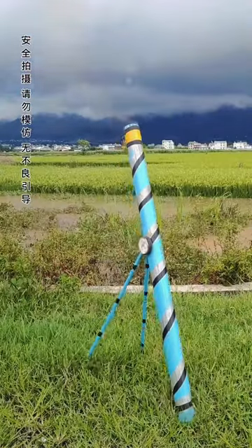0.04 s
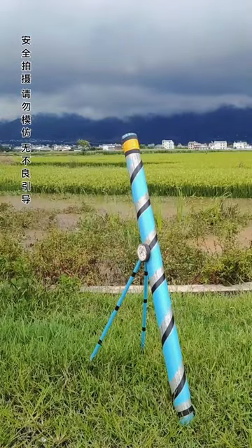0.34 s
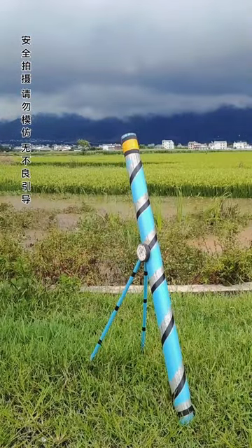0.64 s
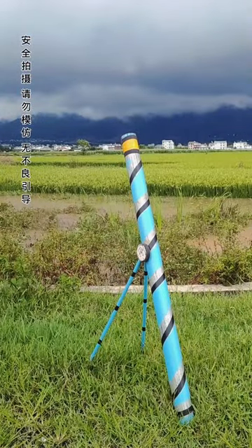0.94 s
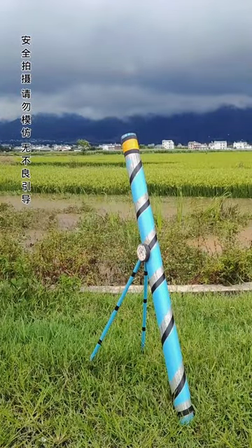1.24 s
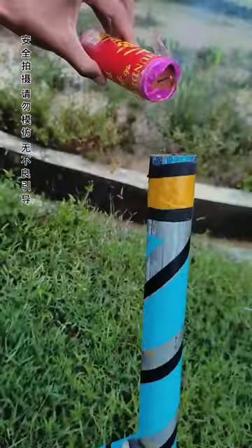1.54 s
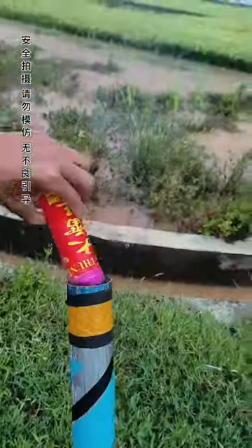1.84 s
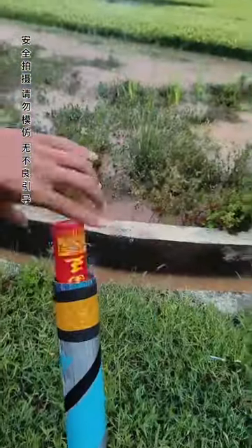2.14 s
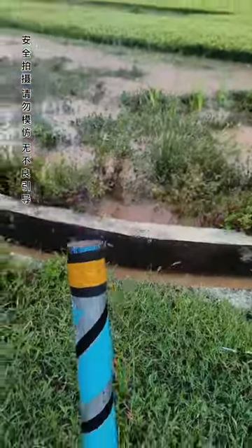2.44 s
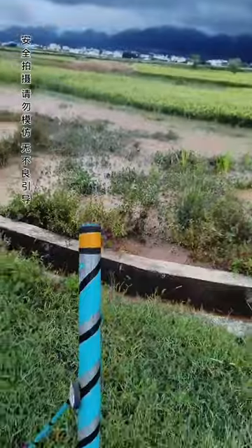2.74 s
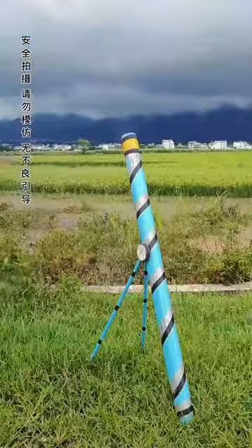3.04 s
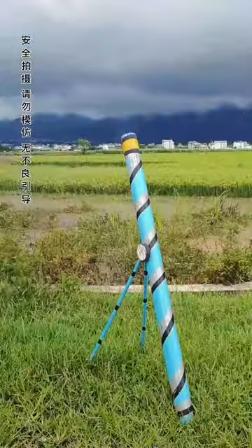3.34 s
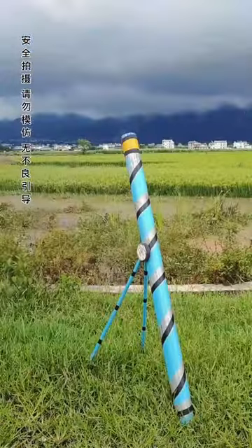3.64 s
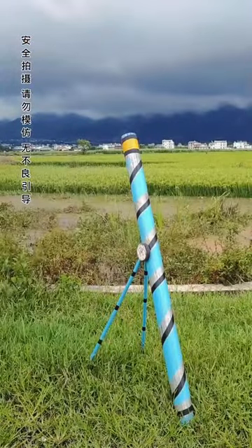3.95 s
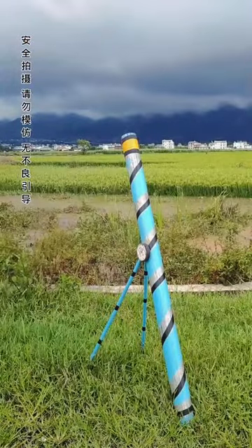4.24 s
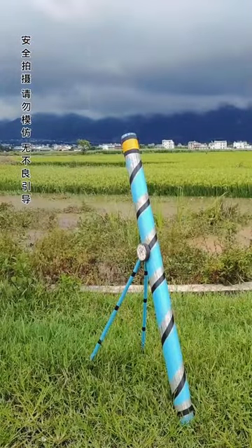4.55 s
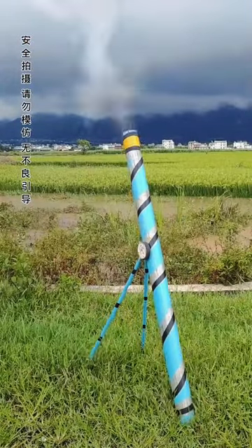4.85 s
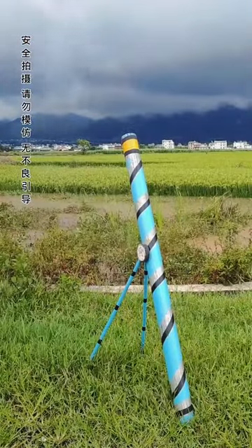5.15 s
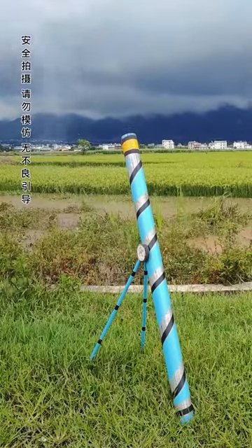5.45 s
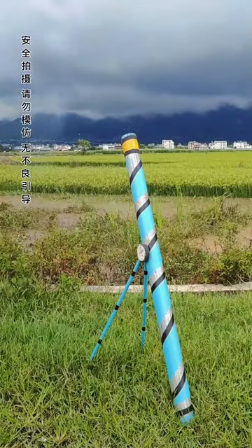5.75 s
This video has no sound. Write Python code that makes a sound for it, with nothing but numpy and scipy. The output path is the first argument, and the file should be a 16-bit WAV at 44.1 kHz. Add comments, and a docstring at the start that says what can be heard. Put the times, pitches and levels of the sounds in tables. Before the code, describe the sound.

A firecracker goes off in a steel tube with a sharp crack, a metallic ring and an echo over an open field. A fuse then hisses and sputters close to the microphone. A short knock follows, and feet brush through dry grass to the right with small ticks. A second sharp blast rings the tube near the end. Gusty wind rumbles and thumps on the microphone for most of the time.

```python
"""A sharp crack, a ringing steel tube and an echo over the paddies: two firecrackers in an open field.
The microphone's gain control flattens each blast, so the ring of the tube's wall swells out of it.
Between the blasts a fuse hisses and flares close by, and feet brush through grass off to the right.
Gusty wind buffets the two microphone ports throughout, over the soft rush of the breeze."""
import sys
import numpy as np
from scipy import signal
from scipy.fft import rfft, irfft, next_fast_len
from scipy.io import wavfile
from scipy.ndimage import uniform_filter1d, map_coordinates

SR = 44100
rng = np.random.default_rng(int(sys.argv[2]) if len(sys.argv) > 2 else 0)


def put_to_file(sound):
    """Save the sound as 16-bit audio at rate SR, in the file named by the first command-line argument."""
    columns = np.atleast_2d(sound).T  # one column per channel
    safe = np.clip(columns, -1, 1)
    whole_steps = np.round(safe * 32767)
    wavfile.write(sys.argv[1], SR, whole_steps.astype(np.int16))


N = 255339
TIME = np.arange(N) / SR

# wall modes of the tube: (frequency [Hz], t60 [s], level in first blast [dB], level in second [dB])
TUBE_MODES = [(939, .9, -28, -30), (1206.5, 1.7, -22.5, -33), (1310, .9, -33, -26), (1845, 1.35, -17, -24),
              (2029, .46, -3.5, -9), (2128, .45, -14, -16), (2680, .4, -22, -15), (2779, .44, -9, -15),
              (2949, .42, -8, -19), (3033.4, .38, -19, 2.5), (3313, .5, -20, -24), (3361.2, .94, -4.5, -10),
              (3389, .94, -4, -14.5), (3409, .45, -26, -17), (3493, .5, -17, -14), (3539, .6, -12, -16),
              (3776, .4, -13, -8), (3827, .4, -20, -14), (3920, .3, -24, -20), (4017, .3, -22, -13),
              (4204, .35, -21, -12), (4465, .3, -22, -20), (4861, .3, -20, -19), (5006, .3, -25, -17),
              (5200, .3, -26, -20), (5383, .3, -26, -20), (5780, .3, -26, -20), (6238, .26, -20, -11),
              (6278, .3, -17, -16), (6430, .3, -26, -14), (6584, .3, -21, -16), (6811, .27, -17, -10),
              (7160, .22, -26, -14), (7455, .22, -21, -13), (7560, .2, -24, -15)]
# high fizz of the fuse and of bright ticks underfoot: (frequency [Hz], level [dB])
FIZZ_SPECTRUM = [(8500, -57), (10300, -14.5), (11800, -14), (13700, -4.5), (15500, -12.5), (17000, -5.5)]


def amp(db):
    """Decibels to gain."""
    return 10 ** (np.asarray(db) / 20)


def unit(x):
    """Scale to rms 1."""
    return x / np.sqrt(np.mean(x ** 2) + 1e-20)


def pan(db):
    """Gains of the two ports for a level of left minus right."""
    return amp(np.vstack([db, -db]) / 2)


def along(points, hz):
    """(Hz, value) points read on a log axis."""
    knots_hz, values = np.transpose(points)
    return np.interp(np.log(hz + 1), np.log(knots_hz), values)


def curves(rows):
    """One value per sample for each column after the time."""
    times, *columns = np.transpose(rows)
    return [np.interp(TIME, times, column) for column in columns]


def wobble(rate):
    """A smooth random curve, rate knots a second."""
    return map_coordinates(rng.standard_normal(8192), [TIME * rate], mode="wrap")


def swell(start, length, attack_s, release_s):
    """An envelope that rises, holds until length has passed, then dies away."""
    t = TIME - start
    return np.clip(t / attack_s, 0, 1) * np.exp(-np.clip((t - length) / release_s, 0, 20))


def specks(per_s, size_db, life_s):
    """A level of rms 1 with tiny bursts at random moments."""
    hits = (rng.random(N) < per_s / SR) * rng.random(N)
    return unit(1 + amp(size_db) * signal.lfilter([1], [1, -np.exp(-1 / (life_s * SR))], hits))


def add(track, start, sound):
    """Mix a stereo sound in at start seconds."""
    part = track[:, round(start * SR):][:, :sound.shape[1]]
    part += sound[:, :part.shape[1]]


def filtered(x, response):
    """Filter x by a response given as a function of frequency."""
    size = next_fast_len(x.shape[-1] + 8192)
    return irfft(rfft(x, size) * response(np.fft.rfftfreq(size, 1 / SR)), size)[..., :x.shape[-1]]


def noise(spectrum, alike=0, lag_ms=0, apart_hz=20000, size=N):
    """Stereo noise of rms 1; a shared part fades above apart_hz and reaches the right lag_ms later."""
    white = rng.standard_normal((3, size))
    share = lambda hz: alike / (1 + (hz / apart_hz) ** 2)
    colour = lambda hz: amp(along(spectrum, hz))
    delay = lambda hz: np.exp(np.outer([1, -1], 1j * np.pi * hz * lag_ms / 1000))
    shared = filtered(white[2], lambda hz: colour(hz) * np.sqrt(share(hz)) * delay(hz))
    separate = filtered(white[:2], lambda hz: colour(hz) * np.sqrt(1 - share(hz)))
    return unit(shared + separate)


def patchy(x, depth_db):
    """Random gain in patches of about 600 Hz by 80 ms."""
    bins = signal.stft(x, nperseg=512)[2]
    patches = uniform_filter1d(rng.standard_normal(bins.shape[1:]), size=7, axis=0)
    patches = uniform_filter1d(patches, size=14, axis=1)
    return unit(signal.istft(bins * amp(depth_db * unit(patches)), nperseg=512)[1][:, :N])


def ragged(x, depth_db):
    """Crowded resonances cut random ridges and valleys into a spectrum."""
    ridges = lambda hz: map_coordinates(rng.standard_normal(2048), [hz / 24], mode="wrap")
    return unit(filtered(x, lambda hz: amp(2 * depth_db * np.tanh(ridges(hz) - .5))))


def dying(x, decay):
    """Each frequency of x fades with its own t60."""
    hz, t, bins = signal.stft(x, SR, nperseg=256)
    fade = amp(-60 * t / along(decay, hz)[:, None])
    return signal.istft(bins * fade, SR, nperseg=256)[1][:, :x.shape[1]]


def breeze():
    """The soft rush of air over the paddies, all round the microphone."""
    # moving air: (frequency [Hz], level [dB])
    air_spectrum = [(30, 15.5), (200, 8.5), (500, 7), (1000, 4.5), (1600, -3), (3000, -4), (4200, -12.5),
                    (7000, -15.5), (9500, -30.5), (12000, -22), (15500, -23.5)]
    return amp(-45.5 + 0.23 * wobble(1.5)) * noise(air_spectrum, alike=0.48)


def wind():
    """Each port has its own turbulence: slow rumble, lumpy flutter, a rasp at its edge in hard gusts."""
    # steady wind at the microphone: (time [s], level [dB])
    strength = [(0.0, -30), (0.4, -27.5), (0.64, -40.5), (0.77, -25.5), (1.04, -24.5), (1.34, -14),
                (1.4, -29.5), (1.45, -11.5), (1.8, -18), (1.99, -22), (2.15, -18.5), (2.39, -22.5),
                (2.44, -18), (2.55, -23), (2.68, -16.5), (2.8, -15.5), (3.02, -15.5), (3.18, -21.5),
                (3.39, -16.5), (3.85, -13.5), (3.96, -19.5), (4.13, -15), (4.24, -20), (4.4, -15.5),
                (4.78, -14.5), (4.87, -19), (5.06, -25), (5.13, -15), (5.4, -16), (5.55, -21),
                (5.79, -15.5)]
    # which port it leans on: (time [s], lean to the left [dB])
    side = [(0.3, 13), (0.6, -6), (0.85, 14), (1.15, 5.5), (1.4, -3.5), (1.62, -5), (1.9, -5.5), (2.15, 1),
            (2.38, 10.5), (2.65, 2.5), (3.6, 2.5), (3.95, -4), (4.4, -1), (5.1, -0.5), (5.4, 7), (5.7, 1.5)]
    # gusts on top of it: (time [s], length [s], flutter [dB], rumble [dB], left minus right [dB])
    gusts = [(0.787, 0.019, -47, -15.5, 0), (0.963, 0.037, -23.5, -23.5, 24),
             (1.088, 0.044, -35.5, -16.5, 23), (1.17, 0.064, -52, -26, 10), (1.27, 0.064, -25.5, -25, -1),
             (1.443, 0.073, -20.5, -20, -18), (1.527, 0.16, -20, -22, -1.5),
             (1.773, 0.056, -17.5, -11.5, 26), (1.852, 0.042, -25, -15.5, 2),
             (1.908, 0.073, -26, -18.5, -20), (2.017, 0.07, -24.5, -20, 27), (2.103, 0.058, -30, -14.5, -6),
             (2.196, 0.028, -25.5, -19, -23), (2.509, 0.076, -19.5, -11.5, 5),
             (2.601, 0.039, -25.5, -12.5, -6), (2.777, 0.026, -17, -10, 3.5),
             (2.844, 0.096, -16.5, -15.5, 28), (2.984, 0.098, -21, -22, 18), (3.116, 0.019, -15.5, -28, -3),
             (3.234, 0.028, -18, -23, -7.5), (3.367, 0.14, -25, -17.5, -5), (3.504, 0.12, -18, -35, -15),
             (3.669, 0.23, -28, -20, -1), (3.986, 0.021, -20, -15.5, -16), (4.028, 0.058, -21, -15.5, 4),
             (4.125, 0.094, -23.5, -14, -2.5), (4.276, 0.078, -19.5, -20.5, 2),
             (4.38, 0.044, -24.5, -15.5, -3), (4.437, 0.078, -25, -18.5, 12),
             (4.676, 0.12, -21, -18.5, 1.5), (4.951, 0.024, -25, -19, 6), (5.084, 0.093, -26, -17, 1),
             (5.216, 0.046, -21.5, -20, -8), (5.268, 0.14, -28.5, -18, 4), (5.369, 0.07, -22.5, -15.5, -17),
             (5.436, 0.048, -27.5, -29, 2.5)]
    # the three parts of the turbulence: (frequency [Hz], level [dB])
    rumble_spectrum = [(8, -15.5), (25, 0.5), (50, -1.5), (100, -4), (170, -9), (260, -16.5), (400, -38.5),
                       (800, -82), (2000, -120)]
    flutter_spectrum = [(60, -6.5), (160, -2.5), (270, -0.5), (400, -4.5), (550, -15.5), (800, -28.5),
                        (1200, -49), (2000, -68), (4000, -102.5)]
    rasp_spectrum = [(200, -14.5), (600, 6), (1200, -3), (2000, -31), (4000, -64)]
    brisk_db, flutter_growth, rasp_growth = -12, 1.84, 2.13  # flutter outgrows rumble, rasp outgrows both
    attack_s, release_s = 0.024, 0.0075
    strength_db, = curves(strength)
    side_db, = curves(side)
    lean = pan(side_db) ** 2
    lean = lean / lean.mean(axis=0)
    rumble_power = lean * amp(strength_db - 1) ** 2
    flutter_power = lean * amp(brisk_db + flutter_growth * (strength_db - brisk_db) - 10.5) ** 2
    for start, length, flutter_db, rumble_db, pan_db in gusts:
        gust = (unit(pan(pan_db)) * swell(start - attack_s / 2, length, attack_s, release_s)) ** 2
        rumble_power += gust * amp(rumble_db + 2) ** 2
        flutter_power += gust * amp(flutter_db + 2.5) ** 2
    lumps = np.minimum([wobble(90) + .5 * wobble(28) for port in range(2)], 2)
    rumble = np.sqrt(rumble_power) * unit(noise(rumble_spectrum) * amp(2.8 * lumps))
    flutter = np.sqrt(flutter_power) * unit(noise(flutter_spectrum) * amp(4.17 * lumps))
    rasp_level = amp(brisk_db - 16.5) * (np.sqrt(flutter_power) / amp(brisk_db)) ** rasp_growth
    rasp = rasp_level * unit(noise(rasp_spectrum) * amp(8.1 * np.minimum(lumps, 1)))
    return rumble + flutter + rasp


def buffets(spacing_s=0.004604, step_db=-4.5, count=3):
    """An eddy breaks on a port as one rounded pressure spike with weaker, wider ones behind it."""
    # the hardest eddies: (time [s], level [dB], left minus right [dB], first spike's width [ms])
    eddies = [(0.968, -13.5, 21, 0.54), (1.106, -9, 16, 1.2), (1.293, -5.5, 1.5, 1.12),
              (1.449, -7.5, -25, 0.35), (1.544, -4, -15, 0.64), (1.579, -17, -21, 0.62),
              (1.622, -8, 29, 0.56), (1.634, 0.5, 24, 0.42), (1.652, -3, -0.5, 0.35),
              (1.675, -6.5, -18, 0.31), (1.789, 2.5, 28, 0.64), (1.801, -24, 20, 0.55),
              (2.042, -2, 22, 1.3), (2.215, 0.5, -36, 1.04), (2.53, -3, -5, 1), (2.542, -14, -1, 0.89),
              (2.603, -2.5, -31, 0.86), (2.782, -6, 14, 1.8), (2.813, -5, -30, 0.71),
              (2.857, -11, 29, 0.29), (2.873, 1, 25, 1), (2.885, -7, 31, 0.56), (2.898, -1.5, 31, 0.36),
              (2.906, -8, 25, 0.32), (2.912, -1, 24, 0.6), (2.934, -5.5, 3, 0.71), (2.987, -2.5, -22, 0.78),
              (3.013, 2, 31, 0.73), (3.037, -10, 26, 0.48), (3.129, 0.5, -2, 0.78), (3.25, -1.5, -32, 0.47),
              (3.307, -9.5, 25, 0.5), (3.415, 1, 32, 0.36), (3.521, -6, -7, 0.59), (3.541, -0.5, -8, 0.54),
              (3.591, 3, -34, 0.45), (3.602, -13, -30, 0.71), (3.618, -7, -30, 0.51),
              (4.139, -1.5, -20, 0.79), (4.156, -2.5, -11, 0.6), (4.169, -6, -27, 0.54),
              (4.181, -17, -16, 0.98), (4.284, -1, -33, 0.26), (4.299, 1, -20, 0.57),
              (4.316, -0.5, -12, 0.62), (4.346, -10, 17, 0.44), (4.388, -12, 23, 0.38),
              (4.479, -3, 20, 0.9), (4.68, -1, 33, 0.72), (4.705, 1.5, 26, 0.71), (4.716, -2, -8, 0.69),
              (4.734, -9, -14, 0.66), (4.758, -3, -6, 0.58), (4.777, -3, -3, 0.64), (4.828, -7, 3, 0.73),
              (5.24, -0.5, -31, 0.85), (5.403, -7.5, -30, 0.49)]
    out, t, order = np.zeros((2, N)), TIME[:SR // 12], np.arange(count)[:, None]
    lead_s = .01  # room for the first spike to rise
    for start, db, pan_db, width_ms in eddies:
        jitter, polarity = rng.uniform(-1.07, 1, (2, 2, count, 1))
        delay_s = spacing_s * order * (1 + jitter / 2)
        width_s = width_ms / 1000 * (1 + order / 4)
        u = (t - lead_s - delay_s) / width_s
        spikes = np.sign(polarity) * (1 - u ** 2 / 2) / (1 + u ** 2 / 2) ** 3 * amp(step_db * order)
        ports = pan(pan_db)
        add(out, start - lead_s, amp(db) * ports / ports.max() * spikes.sum(axis=1))
    return filtered(out, lambda hz: 1 / (1 + (hz / 1700) ** 4))  # the port's mesh blunts the spikes


def rustles(bounce_ms=4.1, bounce_gain=0.47):
    """Dry blades scrape over coarser grit, off to the right, heard directly and again off the ground."""
    # scraps settling, then steps through grass: (time [s], length [s], blades [dB], grit [dB])
    scrapes = [(0.35, 0.04, -48, -64), (0.488, 0.13, -44, -66), (0.629, 0.14, -40, -59),
               (2.705, 0.018, -35, -40), (3.153, 0.059, -45.5, -67), (3.236, 0.096, -46, -53),
               (3.333, 0.059, -49, -65), (3.394, 0.062, -40.5, -59), (3.665, 0.072, -36, -45),
               (3.757, 0.052, -37, -52), (3.794, 0.025, -36, -34.5), (3.812, 0.058, -35, -61),
               (3.874, 0.038, -37.5, -60), (3.917, 0.052, -37, -57), (4.016, 0.1, -57, -49.5),
               (4.24, 0.069, -42, -52)]
    # dry grass and coarse grit underfoot: (frequency [Hz], level [dB])
    grass_spectrum = [(400, 1.5), (1000, -5.5), (1700, -0.5), (2300, 0), (3000, 2.5), (3600, -5),
                      (4400, -10.5), (7000, -14.5), (9300, -31), (11000, -24.5), (15000, -26)]
    grit_spectrum = [(900, -31), (1500, -9), (1900, 6), (2400, 10), (3200, -24), (6000, -40)]
    blade_level, grit_level = sum(amp(dbs)[:, None] * swell(start, length, 0.021, 0.013)
                                  for start, length, *dbs in scrapes)
    grains = unit(amp(1.45 * wobble(700) + 0.52 * wobble(60)))
    crunch = unit(amp(2.5 * wobble(320)))
    crackles = specks(per_s=130, size_db=3, life_s=0.0012)
    blades = noise(grass_spectrum, alike=1.0, lag_ms=-0.29, apart_hz=7900)
    blades = patchy(ragged(blades, 1.7), depth_db=2.5)
    grit = noise(grit_spectrum, alike=0.72, lag_ms=-0.32)
    direct = blade_level * grains * crackles * blades + grit_level * crunch * grit
    return filtered(direct, lambda hz: 1 + bounce_gain * np.exp(-2j * np.pi * hz * bounce_ms / 1000))


def snaps():
    """Falling scraps, and later stalks and grit, give single dry ticks, some dull and some bright."""
    # ticks of falling scraps after the first blast, then snapping stalks and grit: (time [s], dull part [dB],
    # bright part [dB])
    ticks = [(0.63, -15, -65), (0.68, -14, -63), (0.7554, -18.5, -68), (1.129, -22.5, -36),
             (1.2984, -12.5, -68), (3.1288, -23, -41), (3.206, -22, -66), (3.2468, -16, -50),
             (3.262, -18.5, -36), (3.267, -26, -46), (3.3442, -11, -37), (3.381, -18, -32.5),
             (3.672, -19.5, -58), (3.883, -24, -41), (3.982, -19, -40), (4.088, -25, -49),
             (4.272, -27, -50), (4.824, -23, -76), (5.363, -24, -62), (5.449, -39, -65)]
    # a breaking stalk: (frequency [Hz], level [dB])
    stalk_spectrum = [(500, 3.5), (1700, -10), (2500, 6), (3300, 5), (4500, -8.5), (6500, -12),
                      (8000, -14.5), (9500, -33), (15000, -29)]
    dull, bright, t = np.zeros((2, N)), np.zeros((2, N)), TIME[:SR // 20]
    envelope = (amp(-60 * t / 0.012) + amp(-17 - 60 * t / 0.27)) * pan(0.8)
    for start, dull_db, bright_db in ticks:
        add(dull, start, amp(dull_db - 11) * envelope)
        add(bright, start, amp(bright_db + 1.5) * envelope)
    return (dull * noise(stalk_spectrum, alike=0.77, lag_ms=-0.22)
            + bright * noise(FIZZ_SPECTRUM, alike=.3, lag_ms=-0.43))


def knock(start=3.002, db=-25.5, t60_s=0.045):
    """A short dry knock close to the microphone."""
    # body of the knock: (frequency [Hz], level [dB])
    spectrum = [(400, -3), (900, -1), (1500, -1), (2500, -3), (3200, -22), (8000, -32)]
    out, t = np.zeros((2, N)), TIME[:SR // 20]
    add(out, start, amp(db - 60 * t / t60_s) * noise(spectrum, alike=0.24, size=len(t)))
    return out


def hollowed(x, depth_db=-31.5, width_hz=400):
    """A hollow in the hiss wanders as the fuse moves."""
    # centre of the hollow: (time [s], frequency [Hz])
    hollow_path = [(1.45, 3080), (1.58, 3760), (1.62, 5200), (1.76, 5260), (1.85, 6700), (1.95, 4140),
                   (2.1, 4900), (2.3, 5230), (2.42, 4830), (2.6, 4270)]
    hz, t, bins = signal.stft(x, SR, nperseg=512)
    centre_hz = np.interp(t, *np.transpose(hollow_path))
    notch = amp(depth_db * np.exp(-((hz[:, None] - centre_hz) / width_hz) ** 2))
    return signal.istft(bins * notch, SR, nperseg=512)[1][:, :N]


def fuse(lit_s=1.368, fizz_from_s=1.9, sink_db_per_s=2.5):
    """The fuse sputters and flares as it is carried close past the ports and lowered into the tube."""
    # flare-ups: (time [s], length [s], hiss [dB], sizzle [dB], fizz [dB])
    flares = [(1.421, 0.056, -37, -45.5, -80), (1.512, 0.052, -52, -45, -80), (1.61, .06, -52, -71, -41),
              (1.674, 0.12, -38.5, -56, -38), (1.82, 0.12, -62, -67, -48.5),
              (1.91, 0.17, -40.5, -54.5, -50.5), (2.09, 0.28, -39.5, -53, -68),
              (2.348, 0.16, -37, -49.5, -46.5), (2.467, 0.055, -50, -44, -46)]
    # where the fuse is: (time [s], lead at the left port [ms], left minus right [dB])
    path = [(1.42, 0.079, 3), (1.6, 0.23, 1), (1.76, 0.27, -3.5), (1.91, 0.11, 0), (2.3, 0.085, -0.5),
            (2.52, 0.14, -0.5), (2.7, 0.096, -2)]
    # burning powder: (frequency [Hz], level [dB])
    hiss_spectrum = [(900, 7), (1900, 4.5), (2400, 5.5), (3000, 13.5), (3700, 2), (4600, 2.5), (5400, -3),
                     (6300, -5.5), (8500, -26), (10000, -28), (11000, -80)]
    sizzle_spectrum = [(4000, -34), (5800, -17), (6500, -17.5), (7050, 4.5), (7600, 3), (8300, -8.5),
                       (9800, -12), (11000, -52)]
    burn = swell(lit_s, length=1.35, attack_s=0.059, release_s=0.092)  # ends as the microphone draws back
    burn *= amp(-41 - sink_db_per_s * (TIME - lit_s))
    levels = np.array([burn, amp(-20) * burn, amp(-12) * burn * (TIME > fizz_from_s)])
    for start, length, *flare_db in flares:
        levels = np.hypot(levels, amp(flare_db)[:, None] * swell(start, length, 0.029, 0.04))
    hiss_level, sizzle_level, fizz_level = levels
    sparks = lambda: unit(amp(2.2 * wobble(380)))
    hiss = hiss_level * sparks() * patchy(noise(hiss_spectrum, alike=0.82), depth_db=3.0)
    sizzle = sizzle_level * sparks() * noise(sizzle_spectrum, alike=0.2)
    fizz = fizz_level * patchy(noise(FIZZ_SPECTRUM, alike=0.25), depth_db=3.0)
    spits = specks(per_s=140, size_db=2.5, life_s=0.002)  # grains of powder
    left, right = hollowed(hiss + sizzle + fizz) * spits
    sputter = unit(amp(0.19 * wobble(140) + wobble(30.09)))
    lead_ms, pan_db = curves(path)
    left = map_coordinates(left, [np.arange(N) + lead_ms * SR / 1000], order=5)
    return sputter * pan(pan_db) * np.array([left, right])


def smoke():
    """Smoke rushes from the muzzle with a faint whistle until the first charge bursts."""
    # jet of smoke: (frequency [Hz], level [dB])
    spectrum = [(600, -8), (1200, -1), (2800, 0), (3500, -4), (3900, 3), (4400, -10), (7000, -14),
                (9000, -23), (15000, -27)]
    rush = swell(start=-0.01, length=0.105, attack_s=0.029, release_s=0.0075)
    return amp(-43) * rush * noise(spectrum, alike=0.2)


def thinned(x, valley_db, width_hz=55, above_hz=2200):
    """The treble is thinned between the strong ringing tones, so the blast sounds like a clang."""
    near = lambda hz: np.max([1 / (1 + ((hz - mode[0]) / width_hz) ** 4) for mode in TUBE_MODES], axis=0)
    treble = lambda hz: (hz > above_hz) & (hz < TUBE_MODES[-1][0])
    return filtered(x, lambda hz: amp(-valley_db * (1 - near(hz)) * treble(hz)))


def field_echo(t, ragged_db, valley_db):
    """Banks and hedges across the field answer the blast one after another."""
    # the returning sound: (frequency [Hz], level [dB])
    spectrum = [(40, -33), (300, 3), (700, 6.5), (1300, 5.5), (2300, 8), (3200, -2), (4500, -10),
                (8000, -17.5), (15000, -25.5)]
    # its decay: (frequency [Hz], t60 [s])
    decay = [(100, 2.74), (500, 0.89), (2000, 0.86), (5000, 0.73), (15000, 0.78)]
    returns = (1 - np.exp(-t / 0.023)) * amp(2.0 * wobble(49.0))[:len(t)]
    wash = ragged(noise(spectrum, alike=1.0, apart_hz=3070, size=len(t)), ragged_db)
    return returns * dying(thinned(wash, 0.12 * valley_db), decay)


def shell_clang(t, ragged_db, valley_db):
    """The tube's crowd of weak, short wall modes merges into a clang."""
    # the steel shell: (frequency [Hz], level [dB])
    spectrum = [(700, 2), (1400, -6.5), (2200, -1.5), (3300, -3), (4600, -12), (6600, -8.5), (9000, -16.5),
                (11000, -8.5), (15000, -12)]
    # its decay: (frequency [Hz], t60 [s])
    decay = [(700, 0.11), (2200, 0.31), (4000, 0.45), (7000, 0.31), (11000, 0.18), (16000, 0.2)]
    crowd = ragged(noise(spectrum, size=len(t)), 2 * ragged_db)
    return dying(thinned(crowd, valley_db), decay)


def wall_ring(shot, t, waver_db=4.5, steady_t60_s=1.0):
    """The tube's strong modes, out of phase at the two ports; short ones waver, long ones fade evenly."""
    chance, ring = rng.uniform(-1.15, 1, (len(TUBE_MODES), 48)), 0
    for k, ((hz, t60, *levels), (skew, *knots)) in enumerate(zip(TUBE_MODES, chance)):
        unsteady = max(1 / t60 - 1 / steady_t60_s, 0)
        phase = np.array([[0.8], [-0.8]]) * (1 - min(unsteady, 1) * (1 - skew))
        waver = waver_db * unsteady * np.interp(t, np.linspace(0, t[-1], len(knots)), knots)
        polarity = (-1) ** k  # neighbours start opposed, so close pairs swell and beat
        ring += polarity * amp(levels[shot] + waver - 60 * t / t60) * np.sin(2 * np.pi * hz * t + phase)
    return np.sqrt(2) * ring


def muzzle_crack(t, ragged_db, valley_db):
    """A shock leaves the muzzle with uneven spurts of gas, coloured by the tube."""
    # the bursting charge: (frequency [Hz], level [dB])
    spectrum = [(30, -13), (120, 1), (350, -3), (600, -5), (1100, -5.5), (2200, -2), (3500, -2),
                (5000, -10.5), (7500, -12), (9000, -25), (11000, -13), (15000, -15.5)]
    shock = amp(6.5 - 60 * t / 0.098) * noise(spectrum, alike=0.53, apart_hz=2200, size=len(t))
    spurts = amp(0.62 * wobble(420))[:len(t)]
    gas = ragged(noise(spectrum, alike=0.29, apart_hz=1850, size=len(t)), 0.71 * ragged_db)
    jet = amp(8.5 - 60 * t / 0.06) * spurts * gas
    return shock + thinned(jet, 0.14 * valley_db)


def gain_control(x, ceiling_db, hold_share):
    """Loud sound is held near the ceiling; the gain returns as it fades."""
    power = uniform_filter1d(np.mean(x ** 2, axis=0), size=1600)
    return x * (1 + (power / amp(ceiling_db) ** 2) ** 2) ** (-hold_share / 4)


def blasts():
    """Each charge cracks out of the muzzle, rings the steel and rolls back from the field."""
    # firecrackers: (time [s], crack [dB], ring [dB], clang [dB], echo [dB],
    # extra damping of clang and echo [dB/s], raggedness [dB], burst time [ms])
    charges = [(0.102, 8, -5.5, 8.5, -12.5, 1.5, 2, 1.2), (4.972, 14.5, -0.5, 6.5, -13.5, 27.5, 1.5, 3.4)]
    valleys_db = (3, 15)  # thinning of the clang's treble, first and second blast
    out, t = np.zeros((2, N)), TIME[:3 * SR // 2]
    # the slow low-pressure wave behind the shock front
    suction = -.16 * (1 - t / 0.13) * np.exp(-t / 0.13) * (1 - np.exp(-t / 0.0074))
    # the front slips past the gain control
    overshoot = 1 + amp(-8) * np.exp(-t / 0.0024) + 1.14 * np.exp(-t / 0.032)
    for shot, (charge, valley_db) in enumerate(zip(charges, valleys_db)):
        start, crack_db, ring_db, clang_db, echo_db, damping, ragged_db, burst_ms = charge
        crack = amp(crack_db) * muzzle_crack(t, ragged_db, valley_db)
        clang = amp(clang_db) * shell_clang(t, ragged_db, valley_db)
        ring_level = amp(ring_db - damping * t ** 2 / 0.33)  # holds, then falls away
        ring = ring_level * wall_ring(shot, t) * pan(1)
        echo = amp(echo_db) * field_echo(t, ragged_db, valley_db)
        bang = crack + ring + (clang + echo) * amp(-damping * t)
        rise = 1 - 1.08 * np.exp(-1000 * t / burst_ms)  # the case bursts over a few milliseconds
        held = rise * gain_control(bang, ceiling_db=-20, hold_share=0.86)
        add(out, start, held * overshoot + suction)
    return out


def scene():
    """The tube, the footsteps and the weather as they reach the microphone's two ports."""
    return smoke() + blasts() + wind() + buffets() + fuse() + rustles() + snaps() + knock() + breeze()


def record(dry):
    """The sound drops out for a moment, peaks are rounded off and the top of the band is lost."""
    gap_from_s, gap_to_s, top_hz = 1.399, 1.421, 15900
    outside_gap = (TIME < gap_from_s) | (TIME > gap_to_s)
    live = uniform_filter1d(1.0 * outside_gap, size=120, mode="constant")
    rounded = dry / (1 + dry ** 4) ** (1 / 4)
    return filtered(rounded * live, lambda hz: 1 / (1 + (hz / top_hz) ** 100))


dry = scene()
out = record(dry)
put_to_file(out)
```